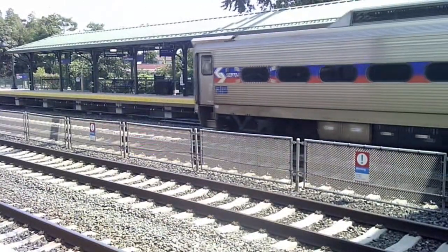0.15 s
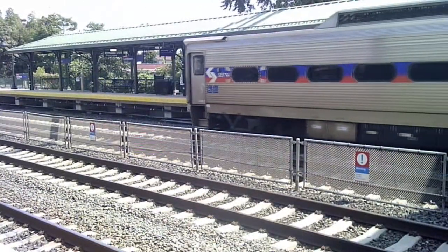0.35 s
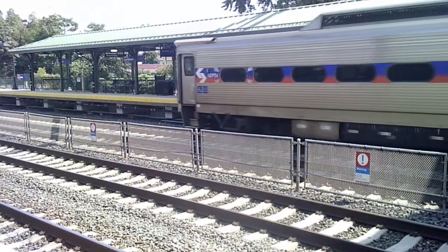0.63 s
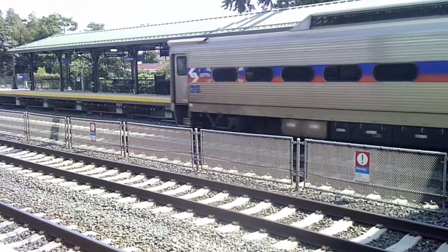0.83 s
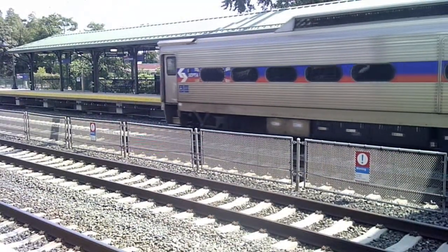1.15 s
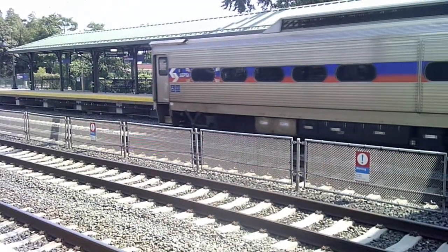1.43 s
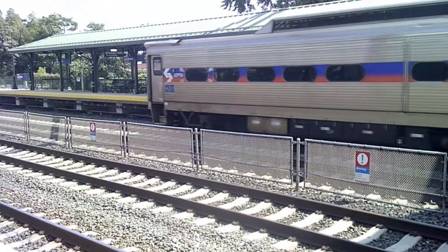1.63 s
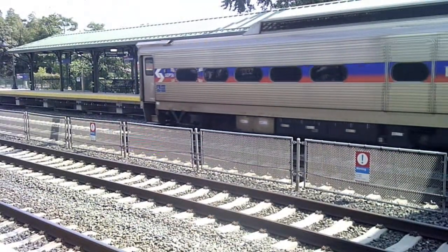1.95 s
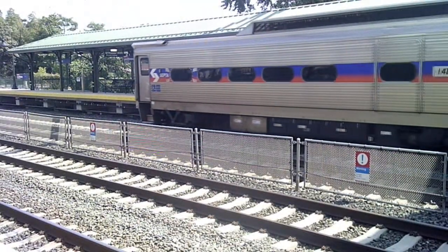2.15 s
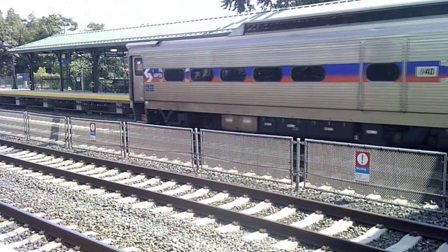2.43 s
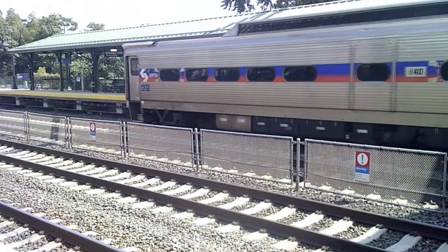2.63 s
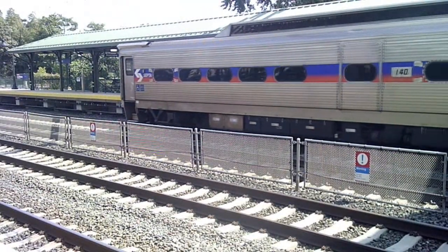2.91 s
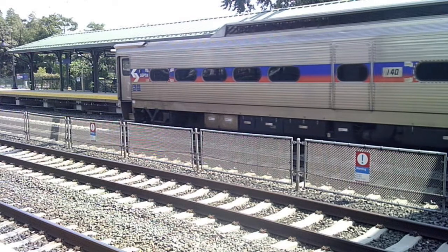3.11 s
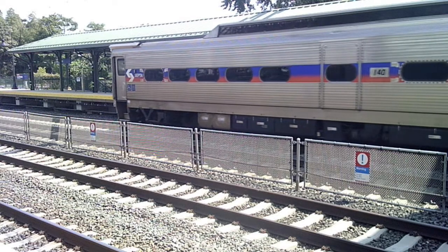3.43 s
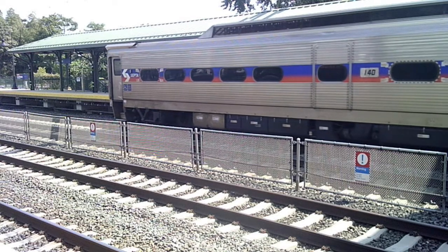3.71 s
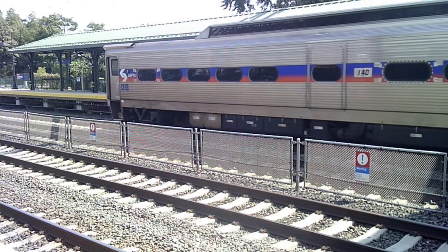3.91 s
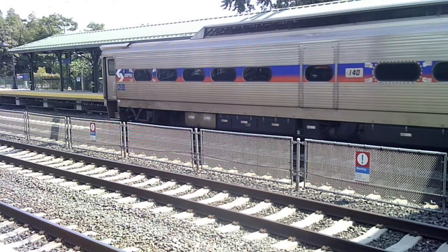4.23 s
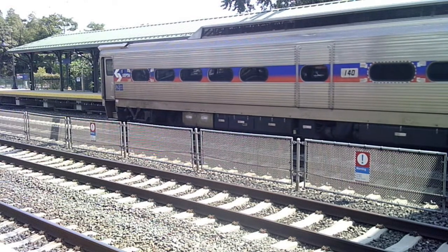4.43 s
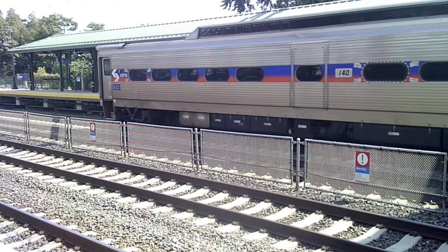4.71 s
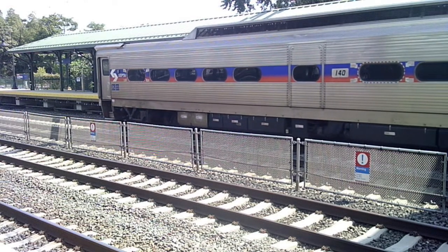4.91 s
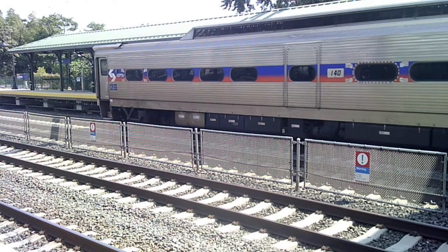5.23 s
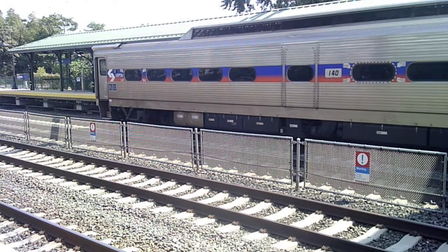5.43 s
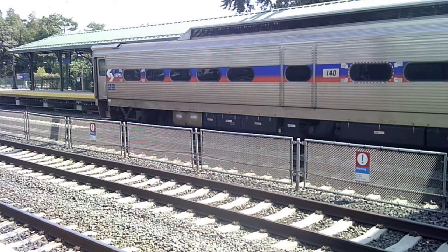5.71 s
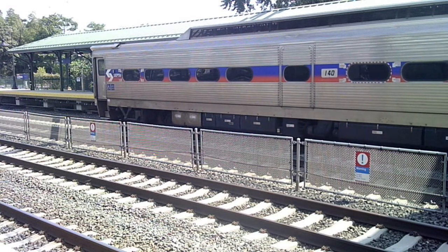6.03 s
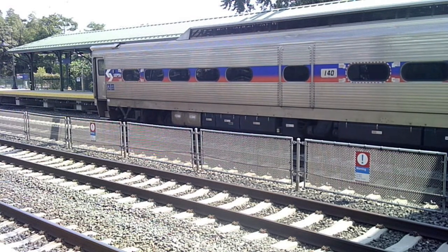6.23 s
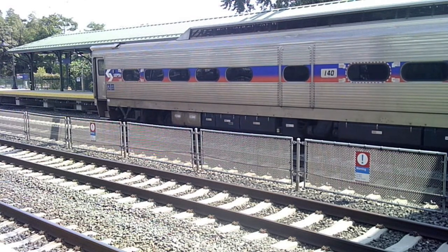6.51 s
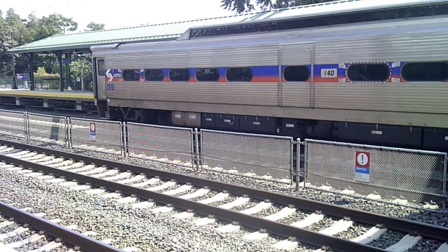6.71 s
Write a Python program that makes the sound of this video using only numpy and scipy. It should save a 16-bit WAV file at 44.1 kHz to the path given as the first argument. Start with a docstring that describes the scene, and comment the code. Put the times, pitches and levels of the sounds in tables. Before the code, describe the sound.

A slow commuter train brakes beside an open platform, piercing unsteady wheel squeals wavering over a low rumbling hum, growing purer and thinning out by the end.

```python
"""An electric train brakes to a halt across the tracks of an open station.
First, brake shoes excite several wheel modes into rough squeals, while a motor whirs up in pitch.
The whir then sinks away and the squeals grow purer, by stick-slip that steadies as the wheels slow.
Throughout, filtered noise makes a roar and duct resonances, and sines with narrow noise make the hum.
A recorder that samples slowly leaves a faint mirror image above the treble."""
import sys
import numpy as np
from scipy import signal
from scipy.fft import rfft, irfft, next_fast_len
from scipy.io import wavfile
from scipy.ndimage import uniform_filter1d, map_coordinates

SR = 44100
rng = np.random.default_rng(int(sys.argv[2]) if len(sys.argv) > 2 else 0)


def unload_wav(signal):
    """Save mono or channel-first audio to the path in sys.argv[1] as 16-bit WAV at rate SR, clipped to [-1, 1]."""
    wavfile.write(
        sys.argv[1],
        SR,
        np.round(np.clip(np.atleast_2d(signal).T, -1, 1) * 32767).astype(np.int16),
    )


N = 302526

# Drone of the standing equipment: t/s, bass gain/dB, roar level/dB before a common lift
EQUIPMENT_LEVELS = [(0.0, -30.5, -35.5), (3.08, -27.5, -36), (6.86, -26, -36)]


def from_db(db):
    """Logarithmic level: decibels to an amplitude ratio."""
    return 10 ** (np.asarray(db) / 20)


def rms_one(x):
    """Normalization: scale a signal to unit rms."""
    return x / np.sqrt(np.mean(np.abs(x) ** 2) + 1e-20)


def in_time(rows, s=None):
    """Linear interpolation: the columns of a table joined by straight lines in time."""
    at, *columns = np.transpose(rows)
    if s is None:
        s = np.arange(N) / SR
    return [np.interp(s, at, column) for column in columns]


def drift(rate_hz, count=N):
    """Low-passed randomness: noise through two equal one-pole filters, run in; spread near 1."""
    run_in = 8000  # samples
    r = np.exp(-2 * np.pi * rate_hz / SR)
    noise = rng.standard_normal(count + run_in)
    slow = signal.lfilter([1], [1, -2 * r, r * r], noise)[run_in:]
    return slow * np.sqrt((1 - r * r) ** 3 / (1 + r * r))


def narrow_noise(hz, width_hz):
    """Resonance: a damped two-pole resonator driven by noise, at rms 1."""
    r = np.exp(-np.pi * width_hz / SR)
    poles = [1, -2 * r * np.cos(2 * np.pi * hz / SR), r * r]
    ringing = signal.lfilter([1, 0, -1], poles, rng.standard_normal(N + SR))
    return rms_one(ringing[SR:])  # the first second is run-in


def roar():
    """Broadband flow noise: the roar of fans and air is noise shaped by a fixed spectrum."""
    # Spectrum of the roar: f/Hz, relative spectral level/dB
    spectrum = [(36, -29.5), (62, -2), (144, -14), (222, -5.5), (300, -16), (362, -14.5), (489, -14),
                (612, -19.5), (767, -18), (2800, -27), (3510, -27.5), (4390, -28.5), (5500, -32),
                (7150, -67.5), (12100, -120)]
    lift_db, flicker_db, flicker_hz = 8.5, 0.34, 6.3
    _, roar_db = in_time(EQUIPMENT_LEVELS)
    size = next_fast_len(N)
    hz = np.maximum(np.arange(size // 2 + 1) * SR / size, 1)
    corner_hz, corner_db = np.transpose(spectrum)
    colour = from_db(np.interp(np.log(hz), np.log(corner_hz), corner_db))
    noise = rms_one(irfft(rfft(rng.standard_normal(size)) * colour, size)[:N])
    return from_db(roar_db + lift_db + flicker_db * drift(flicker_hz)) * noise


def duct_resonances():
    """Cavity resonance: each duct mode rings as a narrow band of noise."""
    # Duct modes: f/Hz, bandwidth/Hz, rms level/dB
    modes = [(35, 24, -35), (85, 13, -38), (210, 32, -39), (239.1, 12, -35.5), (497, 6.4, -42.5),
             (1043, 13, -62.5)]
    return sum(from_db(db) * narrow_noise(hz, width_hz) for hz, width_hz, db in modes)


def bass_hum():
    """Periodic vibration: steady sines, each clothed in narrow noise at the same frequency."""
    # Hum partials: f/Hz, noise bandwidth/Hz, gain/dB relative to the bass
    partials = [(37, 0.79, 2), (29, 2.4, -6), (53.4, 2.1, -8)]
    bass_db, _ = in_time(EQUIPMENT_LEVELS)
    t = np.arange(N) / SR
    hum = 0
    for hz, width_hz, db in partials:
        hum = hum + from_db(db) * (np.sin(2 * np.pi * hz * t) + 0.37 * narrow_noise(hz, width_hz))
    return from_db(bass_db) * hum


def motor_whir():
    """Rotational sound: a motor running up sounds a tone and a weaker one a fifth (3/2) above."""
    # Motor running up: t/s, f/Hz, rms level/dB of the lower tone
    run_up = [(0, 101.2, -36), (1, 105.1, -39), (1.7, 112.9, -30.5), (2.3, 114.7, -29), (2.8, 118.2, -29.5),
              (3.15, 121.7, -48.5), (3.6, 122.4, -51)]
    whir_hz, whir_db = in_time(run_up)
    turn = 2 * np.pi * np.cumsum(whir_hz) / SR
    tones = np.sin(turn) + from_db(-11.5) * np.sin(3 / 2 * turn)
    return np.sqrt(2) * from_db(whir_db) * tones


def drone():
    """Superposition: roar, ducts, hum and motor add as independent sources."""
    return roar() + duct_resonances() + bass_hum() + motor_whir()


def station(x):
    """Scattering: car sides, fence and canopy return a dense decaying tail that smears each glide."""
    t60_s, level_db, delay_s = .3, -12, .012
    t = np.arange(int(.4 * SR)) / SR
    tail = rng.standard_normal(len(t)) * from_db(-60 * t / t60_s) * (t > delay_s)
    tail = tail / np.sqrt(np.sum(tail ** 2))
    return x + from_db(level_db) * signal.fftconvolve(x, tail)[:N]


def swell(start, length, first_hz, last_hz, db):
    """Growth and decay of an oscillation: a straight glide with a rise, a hold and a fall."""
    rise_share, fall_share, edge_db = .2, .35, -12  # edges relative to the hold
    share = np.array([0, rise_share, 1 - fall_share, 1])
    pitch = [(start, first_hz), (start + length, last_hz)]
    level = np.transpose([start + length * share, db + edge_db * np.array([1, 0, 0, 1])])
    return pitch, level


def squeal(pitch, level, waver_db):
    """Stick-slip self-excitation: uneven grip shakes the tone and spreads part into a noisy skirt."""
    # Grip of the shoes, steadying as the wheels slow: t/s, roughness (0-1)
    grip = [(0, .75), (1.7, .8), (2.3, .6), (3.2, .55), (3.6, .7), (4.05, .7), (4.2, .3), (4.6, .3),
            (4.8, .55), (5.0, .45), (5.12, .18), (5.45, .2), (5.65, .3), (5.9, .25), (6.9, .15)]
    # How each wheel mode takes uneven grip: f/Hz, share of roughness, wander/Hz at full roughness
    wheel_modes = [(1925, .6, 6), (2120, .95, 14), (2980, .4, 6), (3320, .85, 13), (3520, .95, 18),
                   (3850, .9, 14)]
    fade_s, flutter_hz, wander_rate_hz, skirt_rate_hz = 0.014, 12, 20, 36
    skirt_db = 1  # extra level at full roughness
    octave_db, octave_below_hz = -17, 2300  # the low modes also sound their octave

    at, level_db = np.transpose(level)
    start, end = max(round(at[0] * SR), 0), min(round(at[-1] * SR), N)
    count = end - start
    s = np.arange(start, end) / SR
    hz, = in_time(pitch, s)
    _, rough_scale, wander_hz = min(wheel_modes, key=lambda mode: abs(mode[0] - hz.mean()))
    rough = np.clip(rough_scale * in_time(grip, s)[0], 0, .98)

    fade = np.clip(np.minimum(s - at[0], at[-1] - s) / fade_s, 0, 1)
    size = np.interp(s, at, from_db(level_db / 2)) ** 2 * fade  # rounded swells
    size = size * from_db(skirt_db * rough + waver_db * drift(flutter_hz, count))

    shaken_hz = hz + wander_hz * rough * drift(wander_rate_hz, count)
    phase = 2 * np.pi * np.cumsum(shaken_hz) / SR
    skirt = (drift(skirt_rate_hz, count) + 1j * drift(skirt_rate_hz, count)) / np.sqrt(2)
    tone = (np.sqrt(1 - rough ** 2) + rough * skirt) * np.exp(1j * phase)
    # squaring the complex tone doubles its frequency
    octave = from_db(octave_db) * (hz < octave_below_hz) * tone ** 2 / np.abs(tone)

    out = np.zeros(N)
    out[start:end] = np.sqrt(2) * size * (tone + octave).real
    return out


def brakes():
    """Modal superposition: long and short squeals of all wheel modes sound together."""
    # Long squeals, gliding with the load on the shoe, one table each: t/s, f/Hz
    long_pitch = [
        [(0.5, 3003.0), (0.7, 3005.0), (0.85, 3017.0), (1.0, 3018.0), (1.25, 3032.0)],
        [(2.82, 2980.0), (3.0, 2978.0), (3.12, 2949.0), (3.33, 2937.0), (3.45, 2979.0), (3.62, 2952.0),
         (3.7, 3003.0), (3.85, 3019.0), (4.03, 2991.0), (4.15, 2920.0), (4.21, 2975.0), (4.6, 2961.0)],
        [(0.73, 3348.0), (1.0, 3335.0), (1.01, 3318.0), (1.05, 3203.0), (1.09, 3324.0), (1.2, 3321.0),
         (1.25, 3438.0), (1.4, 3396.0), (1.48, 3310.0), (1.6, 3330.0)],
        [(1.78, 3394.0), (1.82, 3305.0), (1.88, 3352.0), (1.98, 3361.0), (2.015, 3281.0), (2.07, 3377.0),
         (2.25, 3427.0), (2.42, 3438.0), (2.475, 3306.0), (2.56, 3374.0), (2.68, 3401.0), (2.82, 3360.0),
         (2.92, 3386.0), (3.0, 3335.0), (3.11, 3293.0), (3.24, 3338.0)],
        [(3.52, 3440.0), (3.59, 3198.0), (3.64, 3180.0), (3.73, 3239.0), (3.8, 3258.0), (3.84, 3353.0),
         (3.92, 3223.0), (3.98, 3349.0), (4.08, 3264.0), (4.15, 3339.0), (4.42, 3325.0), (4.75, 3331.0),
         (4.86, 3268.0), (4.93, 3322.0), (5.2, 3322.0), (5.65, 3322.0)],
        [(5.0, 3333.0), (5.17, 3376.0), (5.48, 3427.0), (5.75, 3443.0), (6.1, 3455.0), (6.41, 3495.0)],
        [(0.0, 3446.0), (0.1, 3484.0), (0.2, 3507.0), (0.3, 3582.0), (0.38, 3589.0), (0.58, 3436.0),
         (0.8, 3438.0), (1.05, 3428.0), (1.22, 3483.0), (1.4, 3559.0), (1.59, 3588.0), (1.75, 3514.0),
         (2.0, 3490.0), (2.13, 3450.0), (2.3, 3481.0)],
        [(2.45, 3462.0), (2.6, 3498.0), (2.8, 3533.0), (2.88, 3592.0), (3.15, 3589.0), (3.26, 3541.0),
         (3.42, 3533.0), (3.52, 3472.0), (3.65, 3547.0), (3.82, 3534.0), (3.92, 3461.0), (4.04, 3457.0),
         (4.13, 3533.0), (4.3, 3483.0), (4.48, 3480.0), (4.56, 3448.0), (4.66, 3517.0), (4.8, 3531.0),
         (4.96, 3515.0), (5.12, 3562.0), (5.33, 3571.0)],
        [(4.1, 3931.0), (4.3, 3938.0), (4.75, 3946.0), (4.95, 3963.0), (5.2, 3944.0), (5.55, 3941.0),
         (5.8, 3957.0), (6.33, 3989.0)],
        [(4.95, 2175.0), (5.5, 2168.0), (6.3, 2175.0)],
        [(2.08, 2131.0), (2.2, 2127.0), (2.3, 2078.0), (2.6, 2092.0), (2.78, 2096.0), (2.87, 2171.0),
         (2.97, 2106.0), (3.2, 2109.0)],
        [(0.9, 2183.0), (1.05, 2114.0), (1.13, 2150.0), (1.22, 2089.0), (1.32, 2121.0), (1.45, 2087.0),
         (1.62, 2100.0)],
    ]
    # Nominal level of the same squeals before waver and skirt: t/s, level/dB
    long_level = [
        [(0.5, -59), (0.57, -14), (0.65, -13), (0.67, -22), (0.7, -12.5), (0.72, -20.5), (0.97, -43.5),
         (1.13, -25.0), (1.25, -48)],
        [(2.82, -49), (2.91, -30.5), (2.94, -43), (3.21, -31.5), (3.24, -43), (3.3, -32.5), (3.48, -42),
         (3.67, -33), (3.76, -13.5), (3.8, -14), (3.85, -23.5), (3.9, -25), (4.03, -34.0), (4.47, -39),
         (4.52, -34.5), (4.6, -48)],
        [(0.73, -34), (0.78, -20), (1.0, -38), (1.05, -16.5), (1.07, -31.0), (1.14, -23), (1.23, -37.5),
         (1.26, -23.5), (1.3, -36), (1.37, -36), (1.4, -28), (1.6, -39)],
        [(1.78, -36), (1.83, -18), (1.96, -26), (1.98, -32.0), (2.02, -13.5), (2.04, -23.5), (2.12, -19.5),
         (2.35, -28), (2.37, -16), (2.43, -24), (2.48, -17.5), (2.68, -21.0), (2.7, -26.5), (2.84, -16.5),
         (2.86, -25), (3.02, -22.5), (3.24, -56)],
        [(3.52, -30), (3.56, -24.5), (3.63, -16), (3.7, -29.5), (3.73, -18), (3.78, -40.5), (3.85, -23),
         (3.91, -22.5), (4.19, -14.5), (4.27, -15), (4.32, -19.5), (4.4, -14), (4.63, -17.5), (4.65, -26.5),
         (4.7, -22), (4.74, -22.5), (4.99, -21.5), (5.04, -36), (5.15, -24.5), (5.34, -29.5), (5.44, -48),
         (5.65, -50.0)],
        [(5.0, -26), (5.05, -34.5), (5.15, -20.5), (5.45, -19.5), (5.51, -33.5), (5.53, -25.5), (5.71, -32),
         (5.78, -20.5), (5.84, -34.5), (5.95, -24.5), (6.08, -27.0), (6.14, -40), (6.18, -24.5), (6.34, -35),
         (6.41, -47)],
        [(0.0, -24.5), (0.06, -30.5), (0.17, -31), (0.23, -40), (0.36, -31.5), (0.43, -32.5), (0.61, -28),
         (0.74, -33), (0.77, -26.5), (1.11, -32.5), (1.32, -29.5), (1.44, -42), (1.56, -29.5), (1.71, -37),
         (1.75, -31.5), (2.0, -35), (2.02, -24), (2.3, -25)],
        [(2.45, -22.5), (2.52, -40), (2.56, -26), (2.58, -34.5), (3.16, -33), (3.26, -21), (3.33, -38),
         (3.53, -19), (3.56, -25.5), (3.9, -31), (4.01, -22), (4.09, -38), (4.14, -25), (4.49, -30),
         (4.52, -38.5), (4.67, -26.5), (4.87, -41), (4.95, -20.5), (5.01, -26.5), (5.09, -22.5), (5.14, -29.5),
         (5.33, -48)],
        [(4.1, -50.0), (4.67, -41), (4.71, -47.5), (4.84, -31), (4.88, -49.5), (4.97, -34), (5.21, -39),
         (5.28, -33), (5.31, -40), (5.59, -33), (5.63, -48), (5.69, -31.5), (5.78, -46), (5.83, -31),
         (6.04, -31), (6.1, -45), (6.12, -37.5), (6.33, -54)],
        [(4.95, -47.5), (5.14, -34), (5.19, -39), (5.44, -29), (5.47, -33.5), (5.52, -30.5), (5.62, -42),
         (6.3, -45)],
        [(2.08, -49), (2.23, -27.5), (2.25, -38), (2.3, -25.5), (2.37, -41.5), (2.5, -27), (2.64, -46.5),
         (2.74, -52), (2.78, -30.5), (2.94, -39), (3.07, -29.5), (3.11, -41), (3.2, -42)],
        [(0.9, -54), (1.07, -27), (1.16, -39.5), (1.28, -30), (1.37, -54), (1.42, -53), (1.45, -24.5),
         (1.49, -30), (1.51, -21), (1.53, -31), (1.62, -50.0)],
    ]
    # Short squeals: start t/s, length/s, first f/Hz, last f/Hz, nominal level/dB of the hold
    short_squeals = [(0, 0.12, 2900, 2945, -23), (0.1, 0.11, 2965, 2978, -22),
                     (0.23, 0.13, 2985, 2975, -33), (0.26, 0.2, 3735, 3705, -31),
                     (0.48, 0.62, 3525, 3480, -35), (0.49, 0.13, 3185, 3205, -33),
                     (0.51, 0.19, 2130, 2095, -33), (0.66, 0.12, 2930, 2945, -28),
                     (0.69, 0.32, 1925, 1912, -35), (1.02, 0.25, 1920, 1920, -45),
                     (1.33, 0.2, 2915, 2945, -36), (1.58, 0.2, 2915, 2905, -37),
                     (1.6, 0.17, 3730, 3770, -27), (1.6, 0.24, 1932, 1942, -33),
                     (1.7, 0.12, 2850, 2870, -43), (1.78, 0.13, 3780, 3790, -39),
                     (1.79, 0.2, 2175, 2105, -37), (1.8, 0.5, 3570, 3520, -36),
                     (1.84, 0.33, 1920, 1935, -41), (2.23, 0.25, 2940, 2922, -39),
                     (2.25, 0.35, 2035, 2035, -42), (2.5, 0.55, 3310, 3330, -34),
                     (2.57, 0.14, 1900, 1910, -39), (2.66, 0.24, 2175, 2165, -37),
                     (3.28, 0.12, 3820, 3810, -37), (3.35, 0.13, 3300, 3325, -41),
                     (3.56, 0.3, 3490, 3470, -38), (3.6, 0.17, 3680, 3730, -35),
                     (3.8, 0.26, 3835, 3890, -40), (3.86, 0.25, 3180, 3240, -31),
                     (4.1, 0.2, 3935, 3945, -45), (4.67, 0.46, 2975, 3010, -38),
                     (4.68, 0.12, 3380, 3395, -35), (4.95, 0.14, 3380, 3400, -33),
                     (5.25, 0.27, 3690, 3610, -44), (5.5, 0.6, 3680, 3735, -39),
                     (5.51, 0.27, 2138, 2128, -35), (5.8, 0.6, 1040, 1042, -47)]
    long_waver_db, short_waver_db = 1.2, 2.5
    long = sum(squeal(pitch, level, long_waver_db) for pitch, level in zip(long_pitch, long_level))
    short = sum(squeal(*swell(*row), short_waver_db) for row in short_squeals)
    return long + short


def scene():
    """Superposition: the scattered squeals, lifted a little, stand over the drone."""
    presence_db = 0.62
    return (from_db(presence_db) * station(brakes()) + drone())[None]


def record(dry):
    """Sampling and imaging: cubic curves through quarter-rate samples leave a mirror of the treble."""
    # Larger skips of the clock: t/s, step back/recorder samples
    clock_skips = [(.6134, 1.3), (1.1453, .6)]
    step = 4  # output samples for each recorder sample
    slip_every_s, slips_at_s = .21335, (.0578, .1437)  # the clock slips twice a round
    slip_samples = .15  # recorder samples

    low_pass = signal.butter(10, 5400, fs=SR, output="sos")
    padded = np.pad(dry[0], (0, 64), "reflect", reflect_type="odd")
    coarse = signal.sosfilt(low_pass, padded)[::step]

    t = np.arange(N) / SR
    creep = sum((t - at) / slip_every_s % 1 for at in slips_at_s)  # runs ahead, snaps back with a tick
    skips = sum(samples * (t > s) for s, samples in clock_skips)
    shift = uniform_filter1d(slip_samples * creep, size=5) - uniform_filter1d(skips, size=12)
    smooth = map_coordinates(coarse, [np.arange(N) / step + shift], order=3, mode="mirror")

    smooth = signal.sosfilt(signal.butter(6, 11600, fs=SR, output="sos"), smooth)
    steep = signal.ellip(10, .1, 70, 15000, fs=SR, output="sos")
    return signal.sosfilt(steep, smooth + .0027)[None]  # with a small constant offset


dry = scene()
out = record(dry)
unload_wav(out)
```